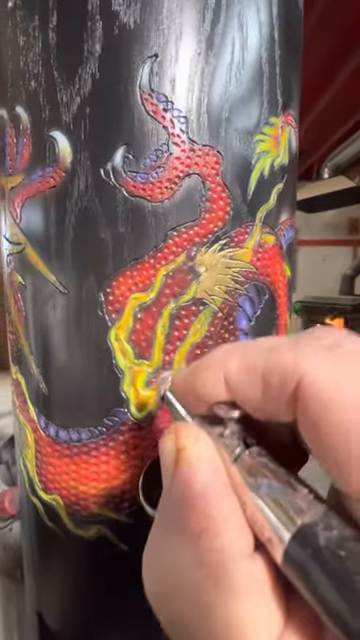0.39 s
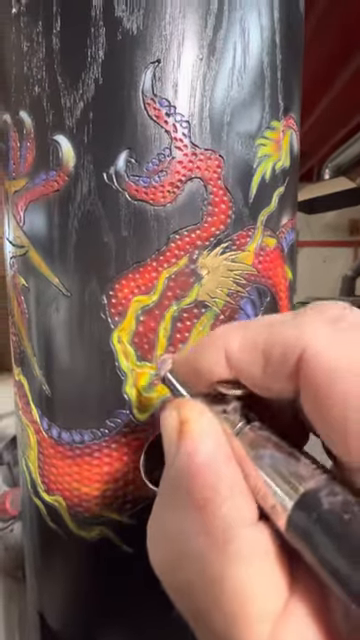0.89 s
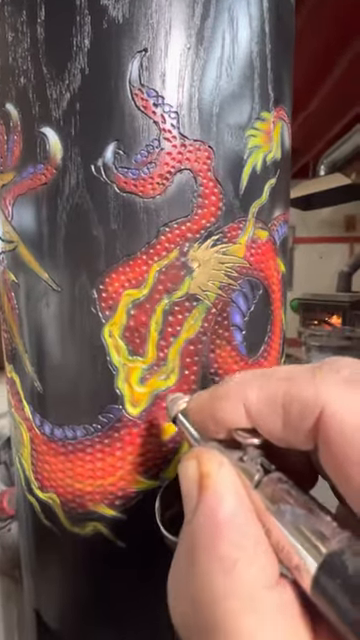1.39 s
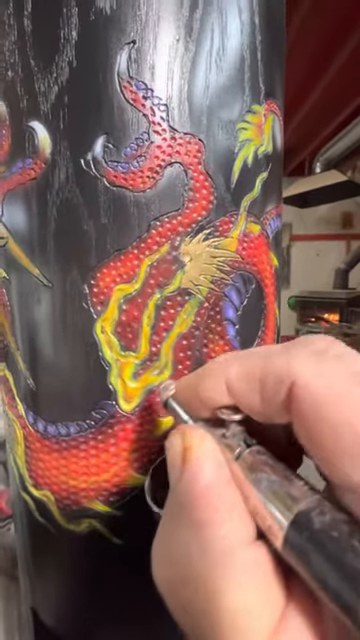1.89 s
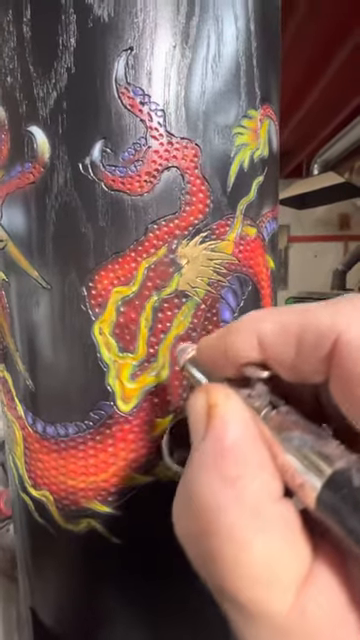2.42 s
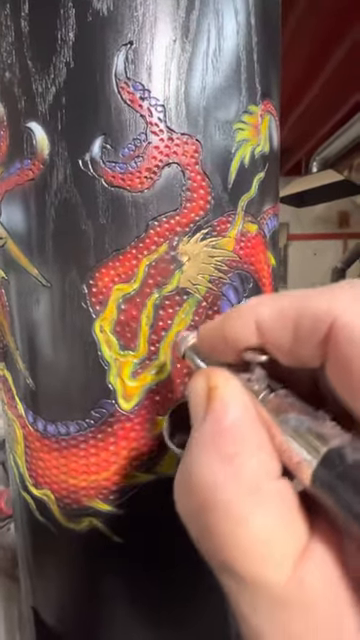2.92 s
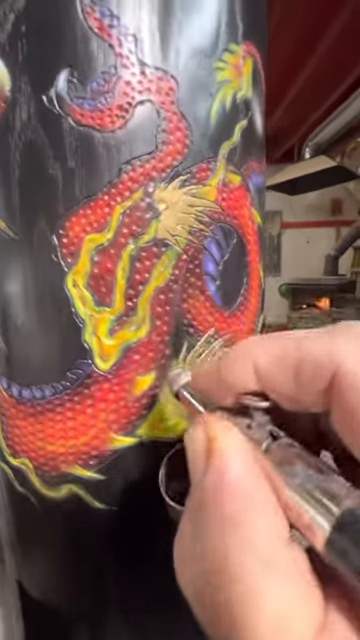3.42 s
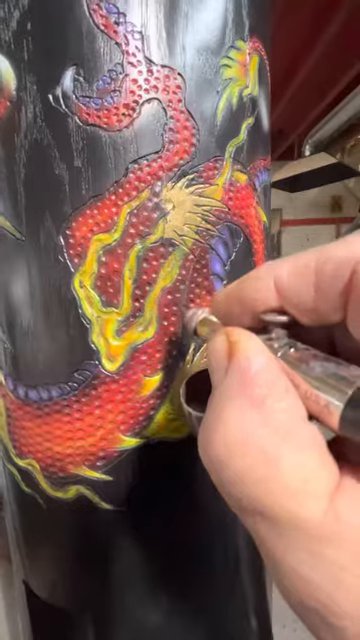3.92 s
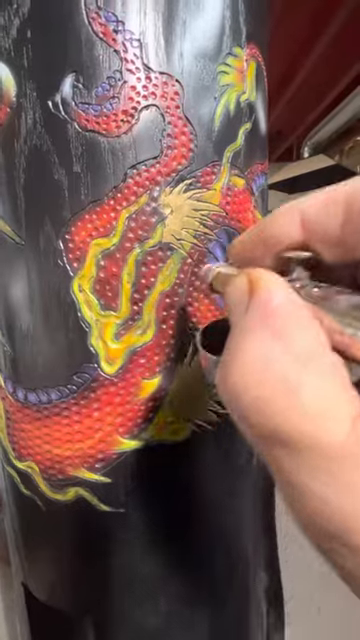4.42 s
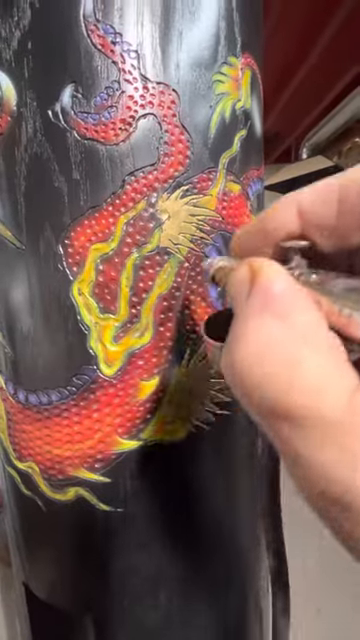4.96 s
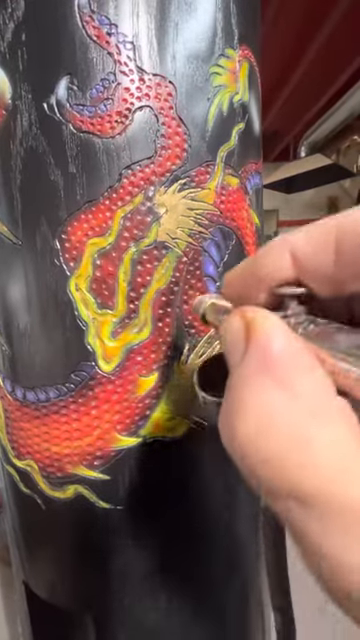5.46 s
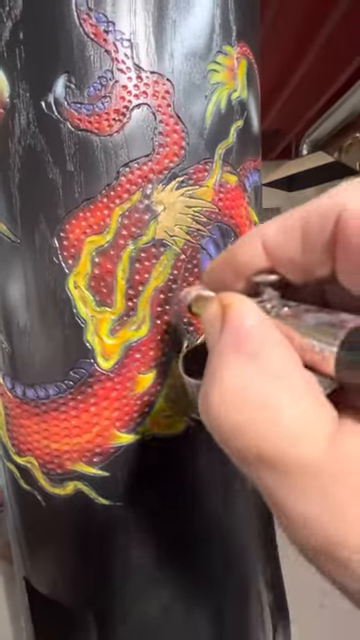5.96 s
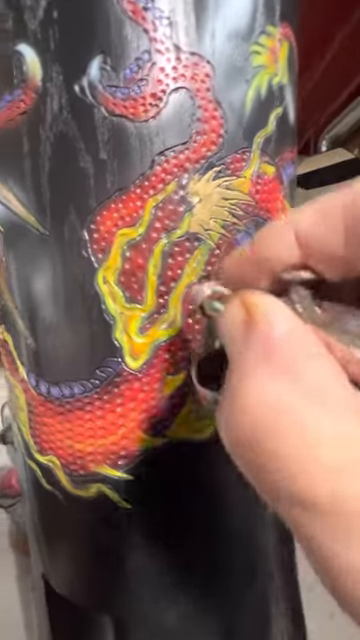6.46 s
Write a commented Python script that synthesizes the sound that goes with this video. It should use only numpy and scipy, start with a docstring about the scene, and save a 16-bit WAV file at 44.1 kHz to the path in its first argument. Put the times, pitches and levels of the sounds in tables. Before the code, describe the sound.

Short, crisp airbrush hisses puff repeatedly up close, starting and stopping sharply over a steady low ventilation hum in a workshop.

```python
"""Workshop: an airbrush close to a phone sprays short puffs onto a hard curved surface.
Jet: noise gated by the trigger valve, swelled and recoloured by the needle; a leak hisses once.
Trigger ticks are decaying noise bursts. A ventilation motor hums (tones in noise halos) over its air rush.
The walls answer the brush; left and right differ in phase and level, set for each frequency."""
import sys
import numpy as np
from scipy import signal
from scipy.fft import rfft, irfft, next_fast_len
from scipy.io import wavfile
from scipy.ndimage import uniform_filter1d, map_coordinates

SR = 44100
rng = np.random.default_rng(int(sys.argv[2]) if len(sys.argv) > 2 else 0)


def nominal_scale(level):
    """Amplitude ratio for a level in decibels (scalar or array-like)."""
    x = np.asarray(level, float) / 20
    return 10 ** x


def log_audio(samples):
    """Write samples as a 16-bit WAV file to the path given in sys.argv[1]."""
    # one column per channel
    frames = np.atleast_2d(samples).T
    # limit to full scale, then quantise
    limited = np.clip(frames, -1, 1)
    pcm = np.round(limited * 32767).astype(np.int16)
    wavfile.write(sys.argv[1], SR, pcm)


N = 290619  # samples

# motor tones and the air noise ringing at the same pitch:
# (frequency [Hz], steady rms [dB], blur rms [dB], blur half-width [Hz])
MOTOR_TONES = [(124, -77.5, -59.5, 8), (159.2, -62.5, -59, 3.7), (239.7, -43, -51, 21),
               (267.9, -41, -54, 17.4), (289.7, -74.5, -53.5, 6.5), (352.6, -72, -54.5, 8),
               (443.3, -62, -62, 7.7), (480.2, -56, -62.5, 2.1), (630.8, -68.5, -59.5, 10),
               (656, -77, -61, 9.9), (732.6, -89, -66, 3.8), (802.8, -55, -68, 5.9), (954.4, -78, -60, 17),
               (1181, -81, -67.5, 8.7)]
# ventilation air rush: (frequency [Hz], relative density [dB per Hz])
AIR_COLOUR = [(20, -37), (45, -1.5), (110, -3.5), (230, 2), (300, -3.5), (500, -3), (560, -11.5), (700, -7),
              (870, -12.5), (1200, -13.5), (1900, -28.5), (2600, -29.5), (3900, -44), (5200, -33),
              (6450, -22), (7100, -61), (8200, -44), (9800, -63), (11600, -44.5), (12700, -44.5),
              (13300, -67), (14300, -56), (15500, -60)]
# ventilation air, left against right: (frequency [Hz], likeness [-1..1])
AIR_LIKENESS = [(50, -0.45), (100, -0.044), (200, 1), (500, 0.25), (1200, 0.49), (2000, 0.78), (4000, 0.95),
                (6400, 0.92), (7200, 1), (12000, .6)]
# decay of the workshop's answer: (frequency [Hz], t60 [s])
WALL_DECAY = [(1500, 0.42), (5000, 0.31), (9000, 0.23), (12000, 0.2), (15000, 0.17)]
# trigger ticks: (time [s], starting rms [dB], highest frequency [Hz])
TRIGGER_TICKS = [(3.362, -60, 5500), (3.437, -54, 5470), (5.3702, -60, 6000), (6.108, -59, 15000),
                 (6.321, -63, 12500), (6.542, -55, 15990)]
# leak hiss: (frequency [Hz], relative density [dB per Hz])
LEAK_SPECTRUM = [(2000, -24), (2700, -2), (3300, -28), (6000, -4), (7200, -2), (7900, -8), (9300, -13),
                 (10500, -14), (12600, -17), (14000, -31)]
# trigger strokes: (opens [s], rise from 0.16 to 0.71 of full gain [s], held [s],
#                   air level before resonances [dB], swell as the needle is drawn back [dB])
TRIGGER_STROKES = [(0.0, 0.0, 0.013, -45.5, 0.1), (0.085, 0.01, 0.19, -44.5, 3.5),
                   (0.346, 0.011, 0.15, -43, 3.5), (0.571, 0.0045, 0.16, -43, 4.5),
                   (0.782, 0.0043, 0.15, -43, 5), (1.305, 0.01, 0.19, -42, 2.5),
                   (1.771, 0.013, 0.25, -41, 3), (2.133, 0.017, 0.214, -41.5, 3.5),
                   (2.478, 0.0086, 0.15, -41, 2.5), (2.749, 0.0096, 0.14, -40.5, 3),
                   (2.991, 0.014, 0.13, -41, 3), (3.497, 0.0059, 0.238, -41.5, 5),
                   (3.831, 0.011, 0.167, -39.5, 6), (4.118, 0.011, 0.24, -40, 4.5),
                   (4.458, 0.007, 0.174, -41, 4.5), (4.725, 0.016, 0.18, -40.5, 5.5),
                   (4.999, 0.0077, 0.22, -41, 4), (5.451, 0.015, 0.181, -40.5, 4),
                   (5.889, 0.018, 0.156, -39.5, 3), (6.333, 0.0088, 0.13, -39.5, 5)]
# jet air before resonances: (frequency [Hz], relative density [dB per Hz])
JET_SPECTRUM = [(500, -10), (1300, -4), (1900, -2), (2500, 2), (4300, -2.5), (6500, 1), (8200, 0.5),
                (10000, 1), (12600, 0), (14000, 0.5), (15500, 1.5)]
# jet, left against right: (frequency [Hz], likeness [0..1])
JET_LIKENESS = [(1500, 1), (8400, 1), (9200, .93), (12000, .85), (15000, .6)]
# splash on the work, nozzle cap, needle tip: (centre [Hz], gaussian width [Hz])
JET_RESONANCES = [(2800, 2400), (5400, 603), (11550, 410)]
# their lift: (with air alone [dB], per swell [dB/dB], drift through a stroke [dB])
RESONANCE_LIFTS = [(3, -1.2644, -0.45), (8, 1.07, 1.5), (17.5, -1.52, -4)]
# echo off the work cancels the jet, mostly less as the brush moves on: (stroke opens [s], dip [dB])
ECHO_DIPS = [(0, -46), (0.9, -24), (1.3, -14), (3.6, -12), (4.6, -8), (6.5, -10)]
# left against right: (frequency [Hz], phase difference [rad], level difference [dB])
STEREO_DIFFERENCE = [(60, 0, -1.5), (240, .33, -3.8), (350, .9, -3.5), (490, 1.3, 2), (800, 2.9, 9.5),
                     (1200, 5.6, 3.5), (1700, 6.28, 0), (4550, 6.28, 0), (5300, 4.2, 0), (5950, 3.9, 0),
                     (6450, 3.14, 0), (7100, 1.5, 0), (7700, 0, 0), (8350, 0, 0), (9100, -2.0, 0),
                     (12000, -1.4, 0), (15500, -1.8, 0)]

TOP_HZ = 15930
FALL_S, FALL_DB = 0.008, 13  # pressure drains FALL_DB in FALL_S
DRAW_PEAK, DRAW_ROUND = 0.54, 0.62  # share of stroke with needle furthest back; path exponent
DIP_HZ, DIP_WIDTH_HZ, DIP_SAG_HZ_PER_DB = 13760, 300, 90  # the dip sinks as the jet swells
TIP_DB_PER_DIP_DB = -0.07  # the closer the work, the louder the tip rings
SAG_DB = -2  # hose pressure sag through a stroke
# a valve not quite shut between two strokes
LEAK_START_S, LEAK_END_S, LEAK_EDGE_S = 2.36, 2.47, 0.015
LEAK_DB, LEAK_GROWS_DB = -64, 5.5
AIR_DB, WALLS_DB = -46.5, -18.0


def unit(x):
    """Scales to rms 1."""
    return x / np.sqrt(np.mean(x ** 2) + 1e-20)


def along(points, hz, axis=1):
    """Interpolates one column of (frequency, value, ..) points on a log axis."""
    table = np.transpose(points)
    return np.interp(np.log(hz + 1), np.log(table[0] + 1), table[axis])


def wobble(knots_per_s):
    """Smooth random curve."""
    knots = rng.standard_normal(int(N * knots_per_s / SR) + 4)
    return map_coordinates(knots, [np.arange(N) * knots_per_s / SR])


def filtered(x, response):
    """Applies a complex response of frequency."""
    size = next_fast_len(N + SR // 2)
    spectrum = rfft(x, size) * response(np.fft.rfftfreq(size, 1 / SR))
    return irfft(spectrum, size)[..., :N]


def patches(shape):
    """Random time-frequency field, rms 1, in patches of about 500 Hz by 40 ms."""
    field = uniform_filter1d(rng.standard_normal(shape), size=3, axis=0)
    return unit(uniform_filter1d(field, size=14, axis=1))


def rush(colour, alike, patchy_db, phase_rad):
    """STFT of patchy stereo noise, with scattered random phase differences between left and right."""
    hz, frame_s, z = signal.stft(rng.standard_normal((2, N)), SR, nperseg=256)
    turn = np.arccos(np.clip(along(alike, hz), 0, 1))[:, None] / 2
    mid, side = z[0] * np.cos(turn), z[1] * np.sin(turn)
    field = patches(mid.shape)
    excess = np.sign(field) * np.clip(np.abs(field) - 1.2, 0, None)
    half_phase = np.exp(0.5j * phase_rad * excess)
    shape = nominal_scale(along(colour, hz))[:, None]
    gain = shape / np.sqrt(np.mean(shape ** 2)) * nominal_scale(patchy_db * patches(mid.shape))
    stereo = np.array([(mid + side) * half_phase, (mid - side) / half_phase])
    return hz[:, None], frame_s, gain * stereo


def sound(z):
    """Turns an STFT back into samples."""
    return signal.istft(z, SR, nperseg=256)[1][..., :N]


def ventilation_air():
    """Broadband flow noise; common and opposed shares set the likeness of left and right."""
    def shares(hz):
        turn = np.arccos(np.clip(along(AIR_LIKENESS, hz), -1, 1)) / 2
        return nominal_scale(along(AIR_COLOUR, hz)) * np.array([np.cos(turn), np.sin(turn)])

    common, opposed = filtered(rng.standard_normal((2, N)), shares)
    return nominal_scale(AIR_DB) * unit(np.array([common + opposed, common - opposed]))


def motor():
    """Steady tones with slight phase wander, each in a halo of resonant air noise."""
    t = np.arange(N) / SR
    tones = 0
    for hz, steady_db, blur_db, width_hz in MOTOR_TONES:
        phase = 2 * np.pi * (hz * t + rng.random()) + 0.12 * wobble(3.07)
        steady = np.sqrt(2) * np.sin(phase)
        blur = filtered(rng.standard_normal(N), lambda f: 1 / (1 + ((f - hz) / width_hz) ** 2))
        tones = tones + nominal_scale(steady_db) * steady + nominal_scale(blur_db) * unit(blur)
    return tones


def walls(x):
    """Room answer: a noise tail, the same left and right, each frequency dying at its own speed."""
    hz, frame_s, z = signal.stft(rng.standard_normal(SR // 2), SR, nperseg=256)
    decay = nominal_scale(-60 * frame_s / along(WALL_DECAY, hz)[:, None])
    tail = signal.istft(z * decay, SR, nperseg=256)[1]
    return signal.fftconvolve(x, tail[None] / np.linalg.norm(tail), axes=1)[:, :N]


def ticks():
    """Metal touches metal: brief decaying noise bursts, each with its own level and highest frequency."""
    out, t = np.zeros(N + SR), np.arange(SR // 50) / SR
    noises = rng.standard_normal((len(TRIGGER_TICKS), len(t)))
    for (start_s, level_db, top_hz), noise in zip(TRIGGER_TICKS, noises):
        band_hz = [1800, np.clip(top_hz, 2500, 20000)]
        band = signal.butter(3, band_hz, "bandpass", fs=SR, output="sos")
        decay = nominal_scale(level_db - 60 * t / 0.024)
        out[round(start_s * SR):][:len(t)] += decay * unit(signal.sosfilt(band, noise))
    return out[:N]


def leak():
    """Thin whistling hiss past the valve, growing until just before the next stroke."""
    z = rush(LEAK_SPECTRUM, [(5000, 0.79)], patchy_db=3.5, phase_rad=0.4)[2]
    t = np.arange(N) / SR
    inside_s = np.minimum(t - LEAK_START_S, LEAK_END_S - t)
    gate = np.clip(inside_s / LEAK_EDGE_S + 1, 0, 1) ** 2
    through = np.clip((t - LEAK_START_S) / (LEAK_END_S - LEAK_START_S), 0, 1)
    return sound(z) * gate * nominal_scale(LEAK_DB + LEAK_GROWS_DB * through)


def jet():
    """Turbulent air through three resonances, valve-gated; drawing the needle swells and recolours it."""
    hz, frame_s, z = rush(JET_SPECTRUM, JET_LIKENESS, patchy_db=1.48, phase_rad=1.53)
    opens, rise, held, air_db, swell_db = np.transpose(TRIGGER_STROKES)

    def stroke_at(time_s):
        return np.clip(np.searchsorted(opens - 0.03, time_s) - 1, 0, None)

    def bell(centre_hz, width_hz):
        return np.exp(-0.5 * ((hz - centre_hz) / width_hz) ** 2)

    k = stroke_at(frame_s)
    through = np.clip((frame_s - opens[k]) / held[k], 0, 1)
    bent = through ** (np.log(0.5) / np.log(DRAW_PEAK))
    drawn_db = swell_db[k] * np.abs(np.sin(np.pi * bent)) ** DRAW_ROUND
    tone_db = 0
    for (centre_hz, width_hz), (rest_db, per_db, drift_db) in zip(JET_RESONANCES, RESONANCE_LIFTS):
        lift_db = rest_db + per_db * drawn_db + drift_db * through
        tone_db = tone_db + lift_db * bell(centre_hz, width_hz)
    dip_db = np.interp(opens[k], *np.transpose(ECHO_DIPS))
    tone_db = tone_db + dip_db * bell(DIP_HZ - DIP_SAG_HZ_PER_DB * drawn_db, DIP_WIDTH_HZ)
    tone_db = tone_db + TIP_DB_PER_DIP_DB * dip_db * bell(*JET_RESONANCES[-1])
    blowing = sound(z * nominal_scale(tone_db + drawn_db + SAG_DB * through))

    t = np.arange(N) / SR
    k = stroke_at(t)
    # pressure builds evenly as the valve opens, drains exponentially as it shuts
    building = np.clip(0.16 + 0.55 * (t - opens[k]) / (rise[k] + 1e-4), 0, 1)
    valve_db = FALL_DB * np.minimum(0, (opens[k] + held[k] - t) / FALL_S - 0.15)
    flutter_db = 1.23 * wobble(35)
    return blowing * nominal_scale(air_db[k] + valve_db + flutter_db) * building


def scene():
    """Brush in its room, over motor and ventilation air."""
    brush = jet() + leak() + ticks()
    return brush + nominal_scale(WALLS_DB) * walls(brush) + motor() + ventilation_air()


def band_limit(x):
    """A steep low-pass at the top of the band."""
    return signal.sosfilt(signal.butter(12, 16850, fs=SR, output="sos"), x)


def record(dry):
    """Phase and level differences shared half to left and right; treble cut below TOP_HZ."""
    def response(hz):
        level = np.sqrt(nominal_scale(along(STEREO_DIFFERENCE, hz, axis=2)))
        half = level * np.exp(0.5j * along(STEREO_DIFFERENCE, hz))
        treble_cut = np.clip((TOP_HZ - hz) / 250, 0, 1) ** 2
        return np.array([half, 1 / half]) * treble_cut

    return band_limit(filtered(dry, response))


dry = scene()
out = record(dry)
log_audio(out)
```